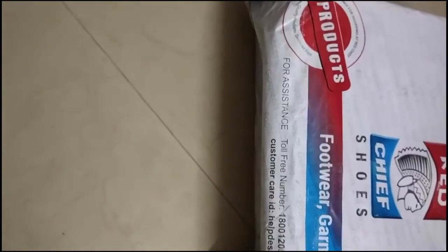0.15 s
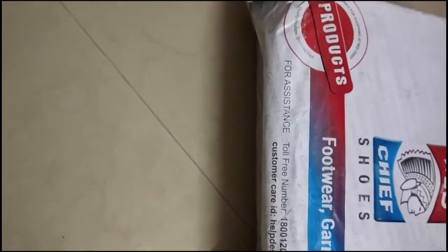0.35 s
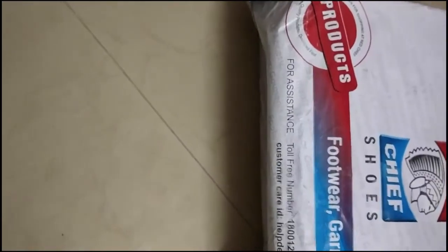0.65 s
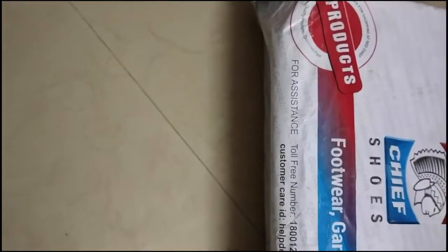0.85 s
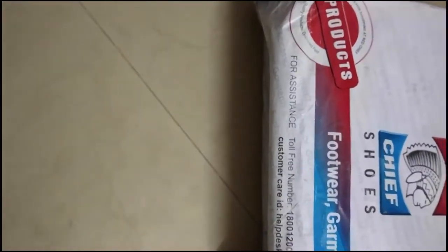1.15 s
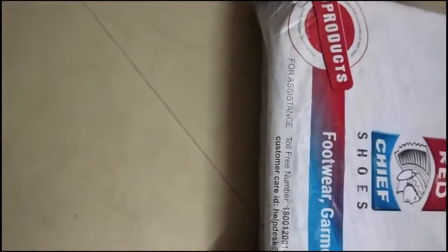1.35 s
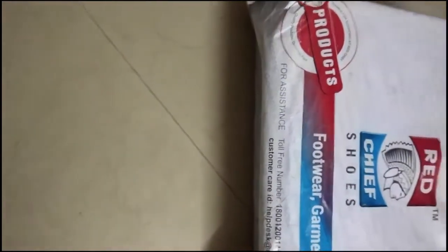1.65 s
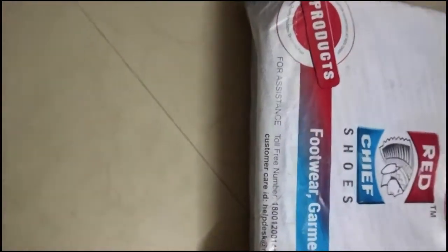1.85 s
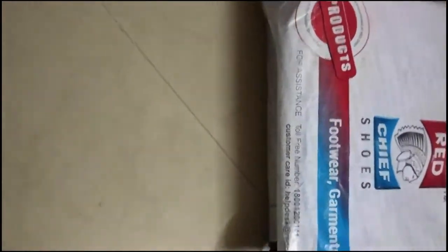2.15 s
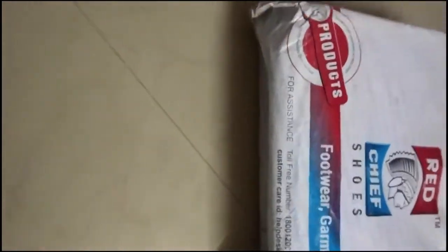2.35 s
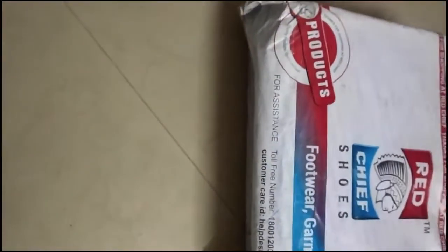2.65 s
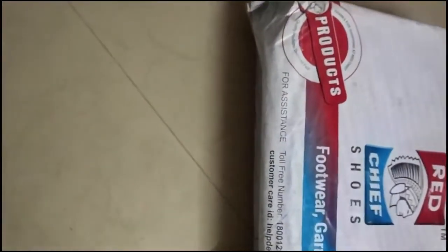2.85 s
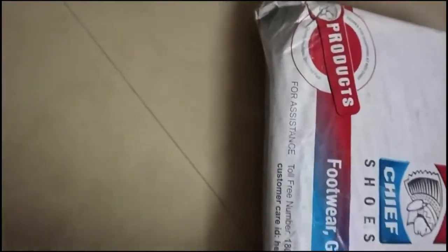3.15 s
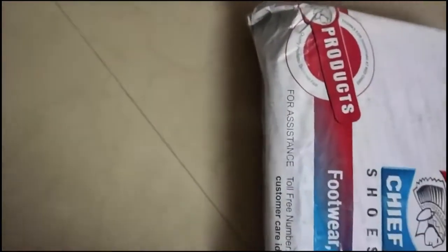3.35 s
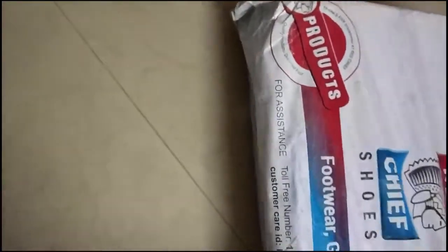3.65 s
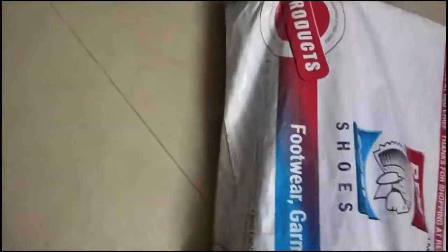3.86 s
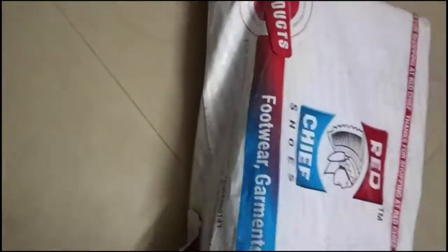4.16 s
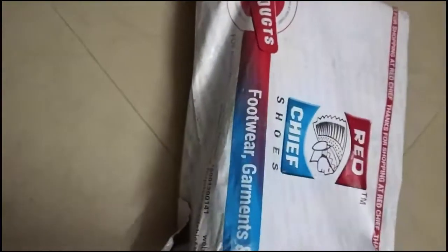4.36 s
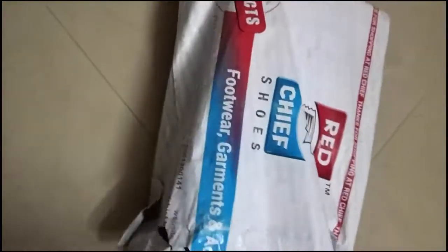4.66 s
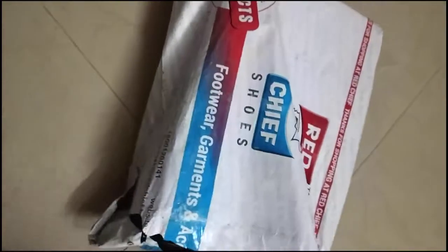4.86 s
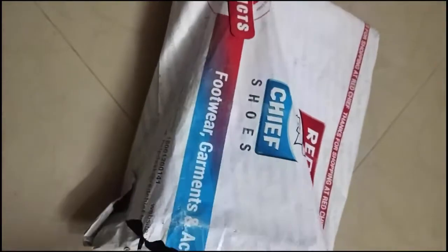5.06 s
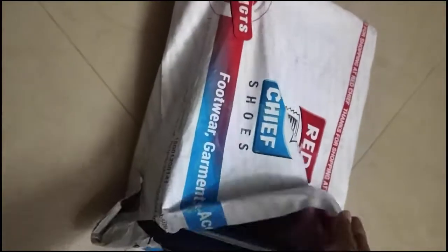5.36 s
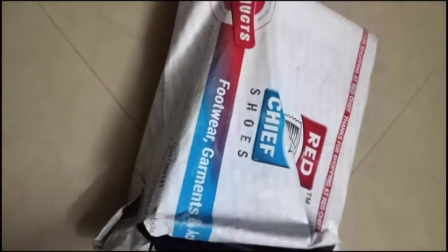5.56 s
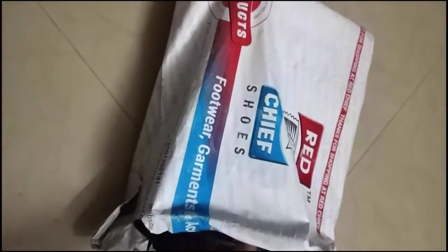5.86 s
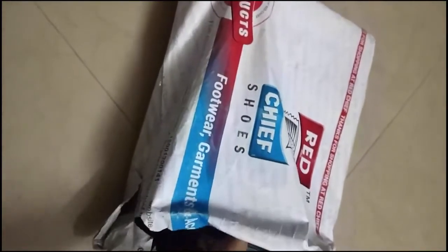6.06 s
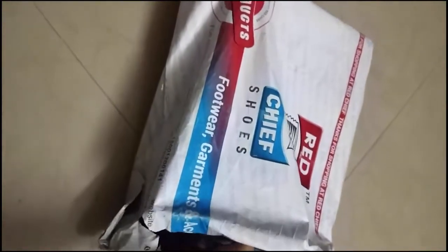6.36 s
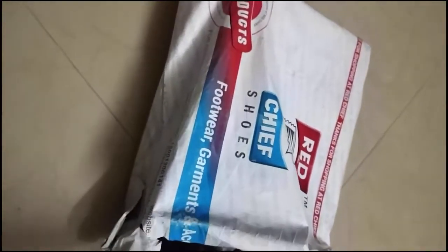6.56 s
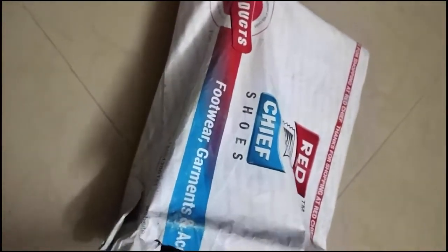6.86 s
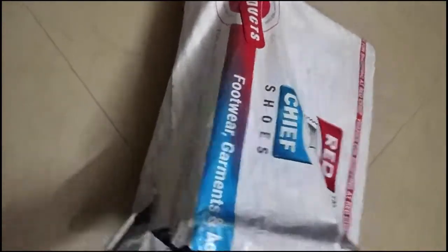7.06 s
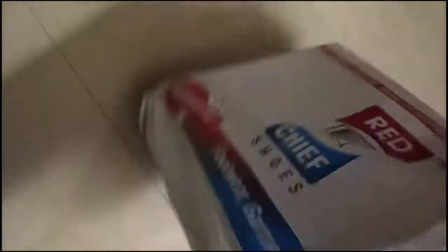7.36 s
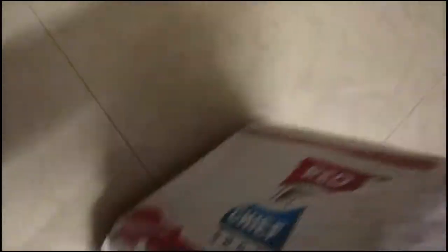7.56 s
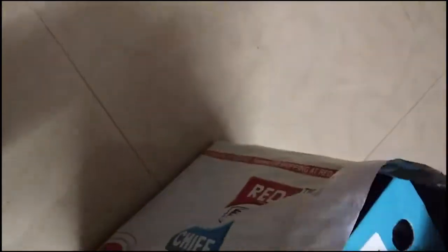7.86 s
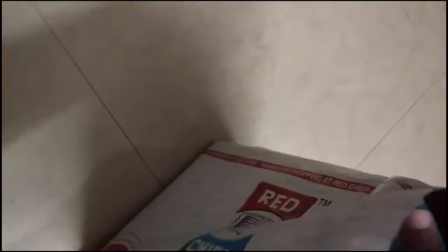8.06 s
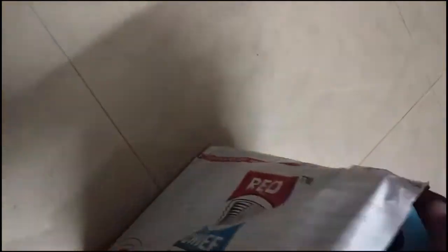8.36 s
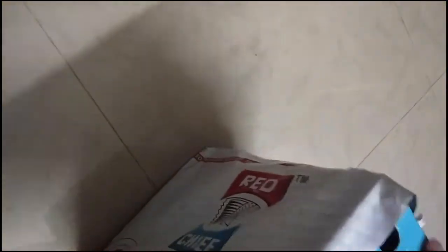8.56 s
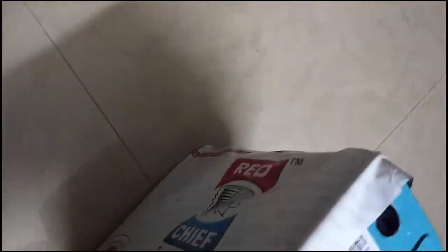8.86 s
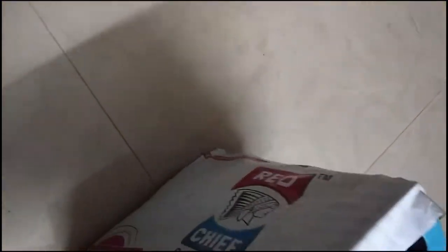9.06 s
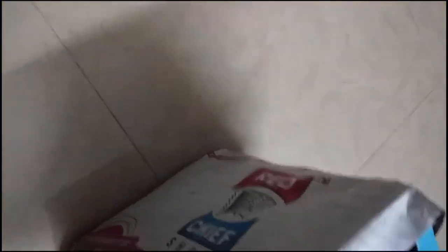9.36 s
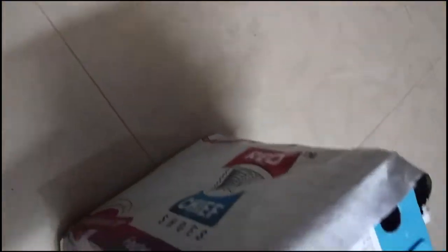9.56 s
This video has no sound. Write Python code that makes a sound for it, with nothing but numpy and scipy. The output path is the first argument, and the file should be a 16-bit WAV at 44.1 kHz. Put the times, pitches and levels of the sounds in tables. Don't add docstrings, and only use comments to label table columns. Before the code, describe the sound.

Close snips and sparse plastic rustles grow into sharp, bright crinkling and tearing, then hollow box rubs and knocks on a tiled floor.

```python
import sys
import numpy as np
from scipy import signal
from scipy.fft import rfft, irfft, next_fast_len
from scipy.io import wavfile
from scipy.ndimage import uniform_filter1d

SR = 44100
rng = np.random.default_rng(int(sys.argv[2]) if len(sys.argv) > 2 else 0)


def int16_out(signal):
    q = np.round(np.clip(np.atleast_2d(signal).T, -1, 1) * 32767)
    wavfile.write(sys.argv[1], SR, q.astype(np.int16))


def boost(x):
    u = np.asarray(x, float) / 20
    return 10 ** u


N = 427769
PORT_LAG = 12
FILM_RELEASE_DB_PER_S, BOX_RELEASE_DB_PER_S = 146, 87


def read(points, hz):
    f, value = np.transpose(points)
    return np.interp(np.log(hz + 1), np.log(f + 1), value)


def amp_of(points, hz):
    return boost(read(points, hz))


def evened(x):
    return x / np.sqrt(np.mean(x ** 2) + 1e-20)


def add(mix, start_s, sound):
    part = mix[:, round(start_s * SR):][:, :sound.shape[1]]
    part += sound[:, :part.shape[1]]


def shaped(x, gain):
    size = next_fast_len(x.shape[-1])
    spectrum = rfft(x, size) * gain(np.fft.rfftfreq(size, 1 / SR))
    return irfft(spectrum, size)[..., :x.shape[-1]]


def high_pass(hz, order):
    return lambda f: 1 - 1 / (1 + (f / hz) ** order)


def ports(x, lag, pan_db):
    pair = np.array([np.r_[np.zeros(lag), x], np.r_[x, np.zeros(lag)]])
    return pair * boost(np.array([[.5], [-.5]]) * pan_db)


def gestures(rows, release_db_per_s):
    t = np.arange(0, N / SR + .002, .002)
    start, rise, hold, db = np.transpose(rows)[..., None]
    after = np.maximum(t - start - rise - hold, 0)
    swell = np.clip((t - start) / np.maximum(rise, 1 / SR), 0, 1) ** 2
    gain = swell * boost(db - release_db_per_s * after)
    return np.interp(np.arange(N) / SR, t, np.sqrt((gain ** 2).sum(0)))


def crease(noise, hz, t60, peak_db=10.0, octaves=0.37):
    t = np.arange(len(noise)) / SR
    burst = noise * boost(-60 * t / t60) * np.minimum(t / 0.0007, 1)
    lean = lambda f: boost(peak_db * np.exp(-(np.log2((f + 1) / hz) / octaves) ** 2))
    return shaped(burst, lambda f: lean(f) / np.sqrt(1 + (1200 / (f + 1)) ** 4))


def grains(per_s, spread_db, count=11):
    which, out = rng.integers(0, count, N), np.zeros((2, N))
    clump = evened(uniform_filter1d(rng.standard_normal((count, N // 64 + 1)), size=12, axis=1))
    hit = rng.random(N) < per_s / SR * np.exp(.8 * clump[which, np.arange(N) // 64])
    size = hit * boost(spread_db * np.minimum(rng.exponential(1, N), 5))
    for kind, hz in enumerate(np.geomspace(900, 14000, count)):
        a, b = rng.standard_normal((2, 300))
        train = size * (which == kind)
        facet = evened(crease(b, hz, t60=.008, peak_db=16., octaves=.45))
        aside = evened(crease(.35 * b + .94 * a, hz, t60=.008, peak_db=16., octaves=.45))
        lag = rng.integers(PORT_LAG - 5, PORT_LAG + 6)
        out[0] += np.roll(signal.oaconvolve(train, aside)[:N], lag)
        out[1] += signal.oaconvolve(train, facet)[:N]
    spectrum = rfft(out, next_fast_len(N))
    level = uniform_filter1d(abs(spectrum), size=901)
    return evened(irfft(spectrum / level, next_fast_len(N))[:, :N])


# pitch_hz, level_db (per Hz)
FILM_TONE = [(290, -4.5), (500, 0), (690, -1), (1280, 2.5), (1410, 2.5), (1980, 8), (3450, 6.5),
             (11600, 2.5), (14500, 2), (15800, 1), (16500, -60)]
# start_s, rise_s, hold_s, effort_db, brightness_db
SNIPS = [(0.0, 0.003, 0.013, -56.5, -3.5), (0.085, 0.023, 0.094, -56.5, 3), (0.156, 0.035, 0.15, -55, 3.5),
         (0.267, 0.027, 0.26, -59.5, 2), (0.575, 0.0071, 0.046, -45, 0.5), (0.624, 0.012, 0.038, -43.5, -2),
         (1.256, 0.011, 0.034, -47, 7), (1.402, 0.028, 0.031, -55.5, 4), (2.007, 0.079, 0.077, -48, 2),
         (2.384, 0.0095, 0.041, -46, 6), (2.436, .01, 0.021, -64, 1), (2.523, 0.065, .06, -61, 6),
         (2.627, 0.025, 0.038, -43, 6.5), (2.716, 0.011, 0.026, -50, 4.5),
         (2.812, 0.044, 0.089, -61.5, 8.5)]
# start_s, rise_s, hold_s, effort_db, brightness_db
TUGS = [(3.024, 0.034, 0.1, -51.5, 4), (3.097, 0.058, 0.037, -44, 1), (3.192, 0.029, 0.073, -44.5, 1),
        (3.314, 0.04, 0.1, -45, 3), (3.461, 0.021, 0.15, -38, -0.5), (3.592, 0.038, 0.23, -39, 0.5),
        (3.717, 0.061, 0.063, -33, -1), (3.933, 0.03, 0.052, -37, -1.5), (4.113, 0.017, 0.027, -49, 2),
        (4.246, 0.012, 0.0074, -44, -4.5), (4.309, 0.027, 0.018, -45.5, 0), (4.39, 0.019, 0.094, -36.5, -2),
        (4.523, 0.025, 0.025, -35.5, 1), (4.598, 0.026, 0.053, -39.5, 0.5), (4.714, 0.022, 0.12, -41, 0.5),
        (4.884, 0.046, 0.065, -39, -2), (4.994, 0.058, 0.16, -41, 1.5), (5.167, 0.032, 0.028, -32.5, -3),
        (5.27, 0.018, 0.015, -33, 0), (5.351, 0.0067, 0.081, -40, 2.5), (5.461, 0.02, 0.057, -46.5, -0.5),
        (5.633, 0.027, 0.23, -51, 0), (5.877, 0.01, 0.025, -43.5, 0), (6.052, 0.013, 0.047, -48.5, 3)]
# start_s, rise_s, hold_s, effort_db, brightness_db
PULLS = [(6.12, 0.027, 0.13, -57, -1.5), (6.29, 0.028, 0.16, -55, 0), (6.53, 0.029, 0.016, -53.5, -3.5),
         (6.667, 0.032, 0.094, -52.5, -2.5), (6.772, 0.038, 0.057, -47.5, -0.5),
         (6.917, 0.052, 0.048, -49, -1), (6.997, 0.044, 0.028, -44, -3.5), (7.057, 0.03, 0.16, -43, 4),
         (7.243, 0.035, 0.037, -40.5, 4.5), (7.337, 0.013, 0.13, -44, 1), (7.596, 0.085, 0.013, -32.5, 0.5),
         (7.85, 0.065, 0.019, -45.5, 6.5), (7.986, 0.011, 0.17, -47.5, 1.5),
         (8.086, 0.035, 0.056, -37.5, 0.5), (8.174, 0.03, 0.17, -36.5, -0.5),
         (8.38, 0.0084, 0.013, -36, -4), (8.43, 0.035, 0.092, -34, 0), (8.57, 0.018, 0.13, -36, -1),
         (8.775, 0.0087, 0.093, -39.5, 0), (8.921, 0.025, 0.081, -37, 0), (9.06, 0.042, 0.13, -44.5, 1.5),
         (9.208, 0.042, 0.17, -45, 2.5), (9.386, 0.072, 0.18, -50, 6), (9.604, 0.025, 0.068, -43.5, -0.5)]
# start_s, rise_s, hold_s, level_db
DRAGS = [
    (1.85, 0.032, 0.081, -62),
    (6.9, 0.038, .2, -63),
    (7.3, 0.037, 0.15, -52.5),
    (7.85, 0.026, 0.38, -51),
    (8.5, 0.044, 0.18, -64),
    (9.3, 0.034, 0.25, -56.5),
]


def rustle():
    dull_db, scuff_db = -8.5, -7
    air_per_bright = 1.6
    rows = np.array(SNIPS + TUGS + PULLS)
    moves, bright_db = rows[:, :4], np.outer(rows[:, 4], [0, 0, 0, 1])

    film = shaped(grains(per_s=5000., spread_db=4.5), lambda f: amp_of(FILM_TONE, f))
    low = shaped(film, lambda f: 1 / (1 + (f / 1500) ** 6))
    high = shaped(film, high_pass(6000, 6))
    body, high = film - low - high, evened(high)
    low = low + np.array([np.roll(low[0], 1500), np.roll(low[1], 2300)])
    air = shaped(high, high_pass(10500, 6))

    handled = boost(dull_db) * gestures(moves - bright_db, FILM_RELEASE_DB_PER_S)
    scuffed = boost(scuff_db) * gestures(SLIDES, BOX_RELEASE_DB_PER_S)
    dragged = gestures(DRAGS, BOX_RELEASE_DB_PER_S)
    dull = np.hypot(np.hypot(handled, scuffed), dragged)
    mix = evened(body) * gestures(moves, FILM_RELEASE_DB_PER_S) + evened(low) * dull
    mix += (high - air) * gestures(moves + bright_db, FILM_RELEASE_DB_PER_S)
    mix += air * gestures(moves + air_per_bright * bright_db, FILM_RELEASE_DB_PER_S)
    return mix * boost(np.array([[-.6], [-2.4]]))


# start_s, ring_db, ring_hz, tick_db
BITES = [(0.114, -45, 5430, -49), (0.3271, -33.5, 5680, -46), (0.586, -26, 6300, -16.5),
         (0.6344, -37, 6330, -27), (0.6763, -32.5, 4220, -24), (0.6812, -30, 4430, -26),
         (1.2614, -26, 4440, -16.5), (1.2904, -30, 5860, -21), (1.9125, -67, 1890, -49),
         (2.3889, -31.5, 3370, -17.5), (2.4163, -32, 6240, -19), (2.6348, -29, 6300, -20),
         (2.6468, -23, 5550, -8.5), (2.7281, -27.5, 6500, -25)]
# start_s, ring_db, ring_hz, tick_db
TUG_CREASES = [(3.045, -43, 2270, -47), (3.1476, -29.5, 4080, -23), (3.264, -32, 2860, -42),
               (3.414, -41, 6550, -32), (3.4813, -27, 3620, -37), (3.4871, -21.5, 4010, -20),
               (3.5283, -26, 3250, -48), (3.6176, -19, 6290, -42), (3.68, -45, 3010, -24),
               (3.6853, -32, 3570, -18.5), (3.784, -35, 2130, -28), (3.8118, -20.5, 3880, -35),
               (3.9453, -33, 3100, -53), (3.968, -31, 3900, -23), (3.991, -18.5, 5770, -34),
               (4.0049, -20.5, 3250, -28), (4.0562, -28, 3570, -29), (4.131, -29, 5930, -32),
               (4.136, -29, 5570, -31), (4.265, -28.5, 4300, -34), (4.276, -35, 4500, -33.5),
               (4.3166, -31.5, 2030, -45), (4.331, -33, 4500, -25.5), (4.4022, -30, 3600, -29),
               (4.41, -29, 3440, -34), (4.4147, -29.5, 3770, -24), (4.4208, -23.5, 4840, -40),
               (4.4873, -40, 1350, -21), (4.547, -48, 2230, -34), (4.5722, -28, 4090, -23)]
# start_s, ring_db, ring_hz, tick_db
TEAR_CREASES = [(4.625, -27, 3500, -30), (4.6468, -24, 4180, -22), (4.679, -24, 4850, -24),
                (4.7152, -31.5, 1970, -34), (4.7392, -33, 2150, -17.5), (4.805, -30, 3800, -41),
                (4.8303, -35, 2430, -41), (4.8959, -21, 1660, -25), (4.9345, -26, 3300, -29),
                (5.0442, -29, 1640, -42), (5.051, -29, 5400, -18.5), (5.1222, -27, 2230, -18),
                (5.174, -20.5, 1700, -19), (5.196, -21, 2900, -21), (5.273, -18.5, 6460, -19.5),
                (5.2878, -21, 4350, -31), (5.307, -17.5, 4670, -33), (5.3599, -22, 4020, -14.5),
                (5.3706, -25, 3480, -33), (5.43, -31, 3430, -30), (5.517, -31.5, 3490, -42),
                (5.6513, -41.5, 3400, -61), (5.7105, -38.5, 1730, -58), (5.7326, -42, 1800, -53),
                (5.8125, -34, 1700, -30), (5.895, -35, 3900, -27), (6.061, -27, 1860, -22),
                (6.1493, -46, 1980, -38)]
# start_s, ring_db, ring_hz, tick_db
PULL_CREASES = [(6.2242, -57, 6720, -44), (6.263, -39, 2000, -67), (6.555, -45.5, 1510, -68),
                (6.5915, -45, 1920, -63), (6.6977, -48, 2090, -49), (6.7593, -41, 2200, -61),
                (7.0224, -31.5, 2100, -60), (7.0314, -25, 1900, -39), (7.037, -35, 1850, -49),
                (7.045, -46, 1940, -30), (7.052, -25.5, 3450, -25), (7.0927, -38, 5860, -29),
                (7.282, -31, 1900, -36), (7.433, -29.5, 1070, -28), (7.49, -32.5, 1660, -53),
                (7.632, -33, 1900, -44), (7.6802, -21, 2250, -45), (7.8828, -30.5, 1920, -47.5),
                (7.9168, -30, 2270, -38), (8.1347, -23.5, 3760, -19.5), (8.281, -25.5, 2190, -49),
                (8.37, -40, 5170, -30), (8.396, -30, 2020, -13.5), (8.5473, -25, 4520, -17),
                (8.658, -18, 5050, -29), (8.801, -25, 3140, -24), (8.8137, -28, 3340, -19),
                (8.842, -23, 2130, -47), (8.8835, -27, 4390, -37), (8.912, -27.5, 2000, -29),
                (8.951, -22, 4800, -16.5), (8.994, -38, 3080, -24), (9.0338, -24, 4300, -39),
                (9.0652, -30, 1940, -48), (9.6385, -36, 3170, -36)]
# start_s, ring_db, ring_hz, tick_db
MORE_CREASES = [(1.272, -36, 3540, -26), (2.39, -36, 2170, -50), (2.462, -33, 3530, -43),
                (2.648, -27, 2350, -40), (3.839, -26, 3050, -32), (4.429, -22.5, 4440, -32),
                (5.115, -28.5, 1930, -27), (5.204, -29, 2470, -27), (7.302, -30, 5500, -36),
                (7.706, -27, 2260, -19), (8.373, -26, 3530, -23), (8.505, -18.5, 3100, -34),
                (8.55, -32, 5960, -31), (1.262, -39, 1170, -60), (3.857, -20.5, 3500, -37),
                (3.966, -32, 4000, -30), (4.019, -28, 3430, -45), (6.123, -43, 1880, -60),
                (7.647, -33, 1500, -43), (7.917, -37, 1020, -60), (8.116, -33, 1140, -34),
                (8.248, -33, 2350, -25), (8.309, -31, 1150, -45), (8.393, -29, 3000, -21.5),
                (8.72, -25, 2200, -40), (8.95, -27, 1980, -27)]


def snaps():
    out = np.zeros((2, N))
    rows = BITES + TUG_CREASES + TEAR_CREASES + PULL_CREASES + MORE_CREASES
    top = high_pass(7000, 8)
    for (s, ring_db, hz, tick_db), (a, b) in zip(rows, rng.standard_normal((len(rows), 2, 800))):
        pair = np.array([.4 * b + 1.1 * a, b])
        t60, octaves = .004 + 15 / hz, min(.65, hz / 6500)
        ring = np.array([crease(n, hz, t60, peak_db=19., octaves=octaves) for n in pair])
        tick = np.array([crease(n, 10000, t60=0.008, peak_db=3.0, octaves=1.0) for n in pair])
        lag = PORT_LAG + round(4 * np.clip(a[0], -2, 2))
        ring, tick = shaped(ring, lambda f: 1 - top(f)), shaped(tick, top)
        for part, db in ((ring, ring_db), (tick, tick_db)):
            part = np.array([ports(part[0], lag, 0.15)[0], ports(part[1], lag, 0.18)[1]])
            add(out, s, boost(db) * part / (0.59 * abs(part).max()))
    return out


# pitch_hz, width_hz, level_db
BOX_MODES = [(217.6, 77, -4), (248, 49, 0), (323.5, 82, -2.5), (403, 126, -4.5)]
# start_s, rise_s, hold_s, rumble_db
SLIDES = [(.03, 0.022, 0.14, -54), (.15, 0.032, 0.32, -60), (.58, 0.0054, 0.11, -51),
          (1.45, 0.042, 0.31, -67), (3.08, 0.031, 0.23, -53), (3.3, 0.091, 0.28, -46.5),
          (3.75, 0.014, 0.04, -45.5), (3.95, 0.014, 0.19, -51), (4.27, 0.018, 0.043, -48),
          (4.42, 0.0082, 0.091, -44), (4.62, 0.013, 0.22, -54), (4.9, 0.036, 0.28, -50.5),
          (5.2, 0.02, 0.19, -48), (5.71, 0.026, 0.097, -45.5), (5.85, 0.048, 0.023, -51),
          (6.06, 0.016, 0.15, -59), (6.78, 0.039, 0.43, -54.5), (7.1, 0.042, 0.13, -47),
          (7.44, 0.045, 0.0068, -42), (7.64, 0.024, 0.052, -39), (7.9, 0.0088, 0.2, -55),
          (8.15, 0.017, 0.59, -48), (8.9, 0.037, 0.087, -46.5), (9.1, 0.04, 0.47, -55),
          (9.5, 0.03, 0.076, -57)]
# start_s, peak_db, pitch_hz
KNOCKS = [(0.054, -32, 276), (3.114, -37, 286), (3.359, -27, 242), (3.642, -29.5, 221), (4.319, -26.5, 240),
          (4.409, -34, 235), (5.195, -26, 260), (5.74, -26, 260), (5.768, -27, 268), (5.814, -23, 266),
          (6.575, -36, 265), (6.861, -33.5, 250), (7.175, -28, 286), (7.429, -30, 266), (7.49, -29.5, 278),
          (7.523, -34.5, 430), (7.68, -17.5, 330), (7.684, -24.5, 546), (7.702, -25, 457),
          (7.884, -34.5, 394), (8.056, -28.5, 336), (8.229, -31, 426), (8.366, -39, 267), (8.58, -35, 300),
          (8.717, -35, 350), (8.954, -25.5, 337), (9.5, -32, 263)]


def box():
    wall_db = -23.5
    slap_db, slap_t60_s = -10.5, 0.0088
    lumps = boost(2.04 * evened(uniform_filter1d(rng.standard_normal(N), size=700)))
    a, b = rng.standard_normal((2, N)) * lumps

    def hollow(f):
        return np.sqrt(sum(boost(2 * db) / (1 + (2 * (f - hz) / width) ** 2) ** 2 for hz, width, db in BOX_MODES))

    rub = evened(shaped(np.array([a + 0.029 * b, a - 0.064 * b]), hollow))
    out = rub * gestures(SLIDES, BOX_RELEASE_DB_PER_S)
    t = np.arange(4000) / SR
    for s, db, hz in KNOCKS:
        modes = np.sin(2 * np.pi * hz * t) + boost(wall_db) * np.sin(2 * np.pi * 1.7 * hz * t)
        boom = boost(db - 60 * t / 0.053) * modes * np.minimum(t / 0.005, 1)
        slap = boost(db + slap_db - 60 * t / slap_t60_s) * np.sin(2 * np.pi * 2.32 * hz * t)
        add(out, s, ports(boom + slap, PORT_LAG // 3, 0))
    return out * boost(np.array([[1.3], [-1.3]]))


# pitch_hz, t60_s
ROOM_RING = [(300, 0.21), (1500, 0.46), (4000, 0.47), (9000, 0.35), (16000, 0.15)]


def room(x):
    taps = np.zeros((2, SR))
    slots = np.arange(200, SR - 10, 10)
    at = slots + rng.integers(0, 10, (2, len(slots)))
    np.put_along_axis(taps, at, rng.choice([-1., 1.], at.shape), 1)
    hz, t, z = signal.stft(taps, SR, nperseg=256)
    decay = boost(-60 * t / read(ROOM_RING, hz)[:, None])
    tail = signal.istft(z * decay, SR, nperseg=256)[1]
    return signal.fftconvolve(x, tail / np.linalg.norm(tail[0]), axes=1)[:, :N]


# start_s, peak_db
JOLTS = [(0.657, -75), (1.236, -79), (2.624, -78), (3.032, -80), (3.763, -73), (3.773, -64), (3.943, -65),
         (4.253, -70), (4.389, -64), (4.459, -67), (4.636, -67), (4.893, -82), (5.053, -73), (5.158, -72),
         (5.233, -69), (6.034, -75), (7.043, -74), (7.417, -63), (7.615, -72), (8.112, -73), (8.367, -67),
         (8.553, -72), (8.782, -70), (8.932, -65)]


def jolts():
    out, t = np.zeros((2, N)), np.arange(3000) / SR
    push_s = 0.0032
    push = t / push_s * np.exp(1 - t / push_s)
    for s, db in JOLTS:
        add(out, s + 0.012, boost(db + 4) * np.outer([1, 0.6], push))
    return out


# time_s, level_db
WHINE = [(1.0, -100), (1.07, -78), (1.19, -80), (1.24, -95), (1.4, -83), (1.55, -84), (1.63, -94),
         (1.7, -82), (1.78, -85), (1.85, -87), (2.05, -92)]


def whine():
    s, db = np.transpose(WHINE)
    t = np.arange(N) / SR
    slow = uniform_filter1d(rng.standard_normal((2, 2, N // 50 + 1)), size=40)
    fuzz = np.repeat(slow, 50, axis=2)[..., :N]
    tone = np.exp(2j * np.pi * 1710 * t)
    carrier = (1 + 0.15 * evened(fuzz[0]) + .2j * evened(fuzz[1])) * tone
    return evened(carrier.real) * boost(np.interp(t, s, db, -140, -140) + 12.5)


# pitch_hz, level_db (per Hz)
HUM_TONE = [(12, -74), (20, -32), (79, -12.5), (251, -2), (452, -11.5), (750, -17), (1470, -21),
            (1600, -12), (2010, -15.5), (3830, -20.5), (4160, -18.5), (7100, -25.5), (9410, -25),
            (15200, -26), (16500, -48)]
# pitch_hz, likeness (-1 to 1)
HUM_LIKENESS = [(60, 0.78), (180, 1), (550, 0.46), (1650, 0.042), (4970, -0.095), (15000, 0.12)]


def hum():
    frames, hz = N // 256 + 5, np.fft.rfftfreq(1024, 1 / SR)
    a, b, c, d, patches = rng.standard_normal((frames, 513, 5)).T
    patches = evened(uniform_filter1d(uniform_filter1d(patches, size=8, axis=0), size=12, axis=1))
    same = np.clip(read(HUM_LIKENESS, hz), -1, 1)[:, None]
    left = a + 1j * b
    z = np.array([left, same * left + np.sqrt(1 - same ** 2) * (c + 1j * d)])
    z *= boost(read(HUM_TONE, hz)[:, None] + 2.2 * patches)
    sound = signal.istft(z, nperseg=1024, noverlap=768)[1][:, :N]
    return boost(-56.5 + np.array([[1.6], [.3]])) * evened(sound)


def scene():
    film, snap, body = rustle(), snaps(), box()
    wet = room(boost(-6.0) * film + boost(-10.5) * snap + boost(-20.0) * body)
    return film + snap + body + wet + hum() + whine()


def top_cut(x):
    return signal.sosfilt(signal.butter(12, 16970, fs=SR, output="sos"), x)


# pitch_hz, level_db
PORT_TILT = [(80, -2), (250, -1), (520, 1), (1100, -3.4), (2200, 2.5), (4500, -0.5), (8500, -3.5),
             (13000, 0.6)]


def record(dry):
    thin = shaped(dry, lambda f: boost(-23.0) + 1 / np.sqrt(1 + (165 / (f + 1)) ** 12))
    left = shaped(thin[0], lambda f: amp_of(PORT_TILT, f) ** .5)
    right = shaped(thin[1], lambda f: amp_of(PORT_TILT, f) ** -.5)
    noise = shaped(rng.standard_normal((2, N)), lambda f: f ** 3 / (1 + (f / 104) ** 7))
    self_noise = boost(-86.5) * evened(noise + 1.5 * noise[::-1])
    mix = np.array([left, right]) + self_noise + jolts()
    return top_cut(mix)


dry = scene()
out = record(dry)
int16_out(out)
```